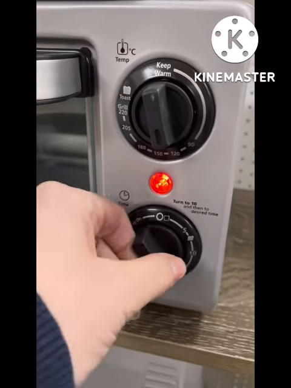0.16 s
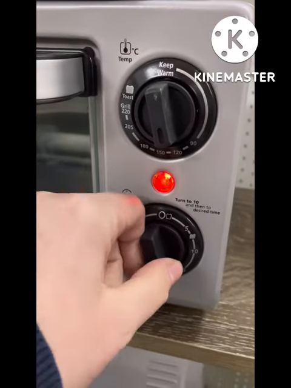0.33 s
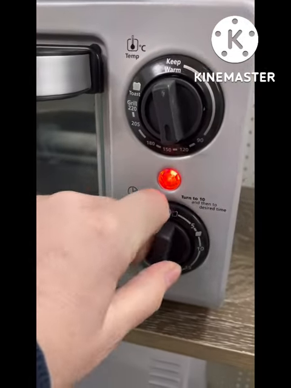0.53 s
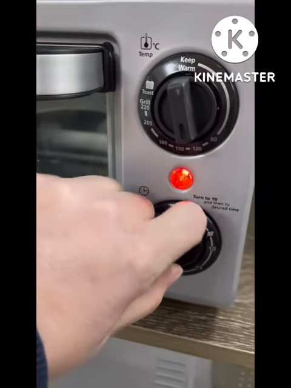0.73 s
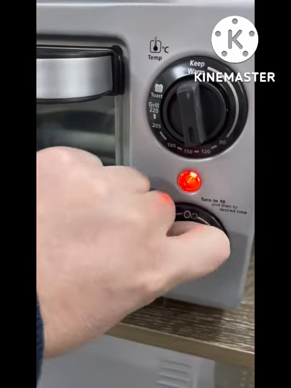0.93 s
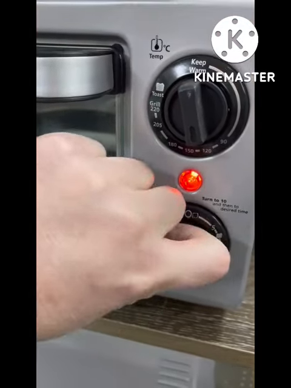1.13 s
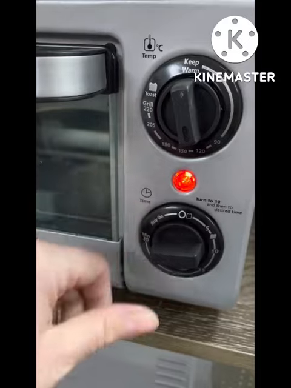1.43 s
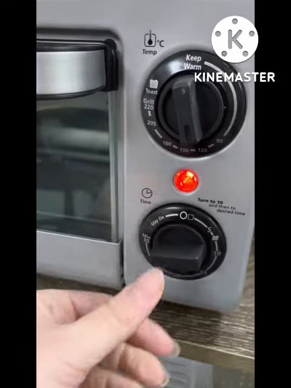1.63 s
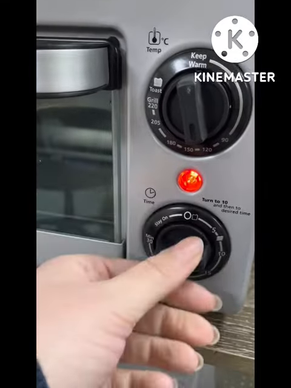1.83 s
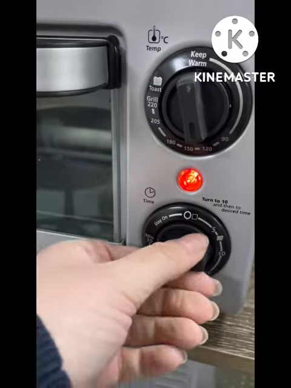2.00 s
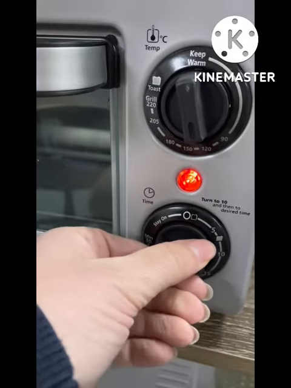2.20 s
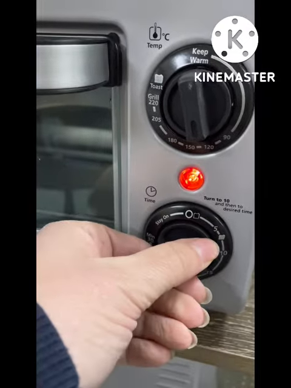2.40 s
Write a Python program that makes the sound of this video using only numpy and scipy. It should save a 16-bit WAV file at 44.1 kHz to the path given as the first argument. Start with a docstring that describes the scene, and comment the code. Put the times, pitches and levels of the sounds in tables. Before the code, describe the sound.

A clockwork oven timer is wound by hand: dull casing bumps, a second of rapid ratchet clicks, a sharp clack, then quick metallic ticking with two short knob rasps, close up in a small quiet room.

```python
"""In a small room with a faint low hum, a hand winds the clockwork timer of a small benchtop oven.
The casing bumps, the ratchet rattles for a second and the knob settles with a clack.
Then the escapement ticks about four and a half times a second, and the knob is nudged twice with a short rasp.
Contacts are sprays of tiny coloured impacts that ring the sheet-metal casing and the room;
thumps, a thud and pings are fading sine waves, and the hum and the rubbing hand are filtered noise."""
import sys
import numpy as np
from scipy import signal
from scipy.fft import rfft, irfft, next_fast_len
from scipy.io import wavfile

SR = 44100
rng = np.random.default_rng(int(sys.argv[2]) if len(sys.argv) > 2 else 0)


def dump(signal):
    """Clip the signal to [-1, 1] and save it as 16-bit WAV at the path in sys.argv[1]."""
    limited = np.clip(np.atleast_2d(signal).T, -1, 1)
    pcm = np.round(limited * 32767).astype(np.int16)
    wavfile.write(sys.argv[1], SR, pcm)


N = 112454  # length in samples

# every level_db is relative: gains, filters and the room act on it later
SOFT_FALL_S = 0.0042  # how fast rasps and soft noise bands die away
CHATTER_ROUGH = 0.73  # how unequal their tiny impacts are


def undb(db):
    """Turn decibels into a gain."""
    return 10 ** (np.asarray(db) / 20)


def unit(x):
    """Scale to an rms (average strength) of 1."""
    return x / np.sqrt(np.mean(x ** 2))


def fade(t, t60):
    """A decay of 60 dB in t60 seconds."""
    return np.exp(-np.log(1000) * t / t60)


def seconds_since(start):
    """Time passed since an event, held at zero before it."""
    return np.maximum(np.arange(N) / SR - start, 0)


def across(points, size):
    """Read a (frequency_hz, value) table at every frequency of a transform."""
    p = np.array(points, float)
    freqs = np.fft.rfftfreq(size, 1 / SR)
    return np.interp(np.log(freqs + 1), np.log(p[:, 0]), p[:, 1])


def colour(x, points):
    """Shape the tone through (frequency_hz, level_db) points with a unit-power filter that never sounds early."""
    size = next_fast_len(2 * N)
    cepstrum = irfft(np.log(unit(undb(across(points, size)))), size)
    # folding the second half onto the first makes the filter minimum-phase
    cepstrum[1:size // 2] *= 2
    cepstrum[size // 2 + 1:] = 0
    tone_filter = np.exp(rfft(cepstrum))
    return irfft(rfft(x, size) * tone_filter, size)[..., :N]


def chatter(rows, fall_s, rough):
    """Contacts (start_s, length_s, level_db): sprays of tiny impacts that build up, hold and die away."""
    power = np.zeros(N)
    for start, length, db in rows:
        age = seconds_since(start)
        rise_s = 0.0004 + 0.12 * length  # longer contacts build up more slowly
        rise = 1 - np.exp(-np.minimum(age / rise_s, 20))
        fall = np.exp(-np.clip((age - length) / fall_s, 0, 20))
        power += (undb(db) * rise * fall) ** 2
    impacts = rng.choice([-1, 1], N) * np.exp(rough * rng.standard_normal(N))
    return np.sqrt(power) * unit(impacts)


def hum():
    """Low room rumble made of noise, with two faint steady tones and hardly any treble."""
    # colour of the rumble: frequency_hz, level_db
    hum_colour = [(20, -38.5), (35, -1), (58, 1), (78, 2), (95, -1.5), (125, -8.5), (230, -17.5),
                  (400, -35), (1200, -50.5), (15000, -48.5)]
    # steady tones: pitch_hz, level_db
    hum_tones = [(63, -57), (94.5, -53.5)]
    t = np.arange(N) / SR
    tones = 0
    for hz, db in hum_tones:
        tones = tones + undb(db) * unit(np.sin(2 * np.pi * (hz * t + rng.random())))
    soften = signal.butter(2, 8000, fs=SR, output="sos")
    rumble = signal.sosfilt(soften, colour(rng.standard_normal(N), hum_colour))
    return tones + undb(-52) * unit(rumble)


def rubbing():
    """A hand rubbing on the knob: soft noise that swells and fades."""
    # course of the rubbing: time_s, level_db
    rub_course = [(0, -33.5), (0.33, -60.5), (0.42, -58), (1.03, -54.5), (1.25, -56), (1.4, -80.5),
                  (2.2, -71), (2.55, -77)]
    # colour of the rubbing: frequency_hz, level_db
    rub_colour = [(80, -0.5), (160, -15), (255, 6), (400, -14.5), (900, -18.5), (12000, -48.5)]
    times, levels = np.array(rub_course).T
    strength = undb(np.interp(np.arange(N) / SR, times, levels))
    return strength * colour(rng.standard_normal(N), rub_colour)


def thud():
    """A deep, soft thud as the knob is nudged: one low swing, quickly damped."""
    # the thud: start_s, pitch_hz, t60_s (time to fade 60 dB), level_db
    deep_swing = (2.205, 68, .25, -35)
    start, hz, t60, db = deep_swing
    age = seconds_since(start)
    onset = 1 - np.exp(-age * hz)
    return undb(db) * onset * fade(age, t60) * np.sin(2 * np.pi * hz * age)


def bumps():
    """Dull handling thumps: each makes low resonances ring, and later ones are softer in tone."""
    # thumps: start_s, level_db
    thumps = [(0.0, -28), (0.020, -24.5), (0.044, -23.5), (0.07, -34), (0.083, -27), (0.099, -23.5),
              (0.117, -31)]
    # low resonances they set ringing: pitch_hz, t60_s (time to fade 60 dB), level_db
    bump_modes = [(180.3, 0.15, 0), (214, 0.085, 2.5), (294.3, 0.16, 0.5), (318, 0.091, -5.5),
                  (524, 0.12, -1.5)]
    dull_db = 80  # loss per octave above the lowest resonance, per second of start time
    rise_s, gain_db = 0.00048, -7
    out = 0
    for start, strength in thumps:
        age = seconds_since(start)
        ring = 0
        for hz, t60, db in bump_modes:
            loss_db = dull_db * start * np.log2(hz / bump_modes[0][0])
            ring = ring + undb(db - loss_db) * fade(age, t60) * np.sin(2 * np.pi * hz * age)
        out = out + undb(strength + gain_db) * (1 - np.exp(-age / rise_s)) * ring
    # a soft contact keeps the thumps to a low band
    soft_band = signal.butter(2, (80, 416), "band", fs=SR, output="sos")
    return signal.sosfilt(soft_band, out)


def taps():
    """Small dry taps of handling: very short sprays of impacts."""
    # taps: start_s, level_db
    tap_times = [(0.154, -39), (0.684, -39), (1.029, -37.5)]
    # colour of a tap: frequency_hz, level_db
    tap_colour = [(150, -48), (500, -1), (1350, 3), (2000, -5), (12000, -49)]
    rows = [(start, 0, db) for start, db in tap_times]
    return colour(chatter(rows, fall_s=0.0036, rough=0.46), tap_colour)


def wash_and_rustles():
    """Soft low-mid room wash lingering after the clack, then two faint rustles: bands of noise."""
    # the wash and the two rustles: start_s, length_s, level_db, centre_hz
    noise_bands = [(1.194, 0.069, -64.5, 780), (1.855, 0.16, -79, 1750), (2.02, 0.044, -78, 1400)]
    out = 0
    for start, length, db, hz in noise_bands:
        # about an octave and a half wide
        band = signal.butter(2, (hz / 2, hz * 1.5), "band", fs=SR, output="sos")
        soft_noise = signal.sosfilt(band, chatter([(start, length, db)], SOFT_FALL_S, CHATTER_ROUGH))
        out = out + np.sqrt(SR / 2 / hz) * soft_noise  # makes up for the power the band removes
    return out


def knob():
    """The knob rasps against its friction clutch, and its plastic clacks into place after the turn."""
    # nudges against the clutch: start_s, length_s, level_db
    nudges = [(2.125, 0.013, -59.5), (2.164, 0.029, -40), (2.514, 0.016, -42.5), (2.526, 0.011, -43)]
    # clack at the end of the turn: start_s, level_db
    knocks = [(1.176, -29.5)]
    # colour of a rasp: frequency_hz, level_db
    nudge_colour = [(250, -4), (600, -10), (1050, -0.5), (1750, -5.5), (2300, 2), (4700, -4.5), (7000, 2.5),
                    (9500, -10.5), (13500, -8), (15500, -41)]
    # colour of the clack: frequency_hz, level_db
    knock_colour = [(850, -3), (1400, -2.5), (2250, 6.5), (2850, -8), (3450, 4), (4600, -8), (6000, 9),
                    (8500, 2), (11000, -14), (13300, -4), (15500, -40)]
    rasps = undb(-1.5) * colour(chatter(nudges, SOFT_FALL_S, CHATTER_ROUGH), nudge_colour)
    rows = [(start, 0, db) for start, db in knocks]
    clack = colour(chatter(rows, fall_s=0.0028, rough=0.49), knock_colour)
    return rasps + clack


def ratchet():
    """The pawl snaps off each tooth with a short bright rattle and scrapes on, duller, up the next."""
    # teeth slipping while the knob is wound: start_s, level_db
    teeth = [(0.001, -37.5), (0.021, -41.5), (0.045, -42.5), (0.069, -42.5), (0.084, -39), (0.102, -41),
             (0.123, -41), (0.135, -40), (0.153, -38), (0.170, -37), (0.19, -42), (0.218, -43),
             (0.236, -41.5), (0.261, -48), (0.297, -45), (0.314, -46), (0.34, -42.5), (0.3725, -39),
             (0.402, -40), (0.423, -43.5), (0.445, -42.5), (0.468, -42), (0.499, -46), (0.523, -44),
             (0.547, -42.5), (0.571, -44.5), (0.588, -49), (0.625, -40), (0.656, -40), (0.686, -39),
             (0.701, -40.5), (0.729, -41), (0.767, -43), (0.786, -42), (0.821, -39), (0.848, -39),
             (0.88, -39.5), (0.907, -39.5), (0.933, -39.5), (0.955, -38.5), (0.979, -40), (1.011, -39),
             (1.034, -48.5), (1.056, -44.5), (1.102, -50)]
    # colour of a tooth: frequency_hz, level_db
    tooth_colour = [(200, -16), (1000, -16), (1830, -14.5), (2130, -1), (2850, -6.5), (3500, -1.5),
                    (4750, -9), (5800, -6.5), (7500, -4.5), (10500, -13.5), (13000, -18), (15500, -30.5)]
    hold_s, split_hz = 0.006, 3400  # contact length; where scrape and snap part
    # each tooth has its own balance of bright snap and dull scrape
    tilt_db = 1.5 * rng.standard_normal(len(teeth))

    def part(kind, tilts, fall_s):
        rows = [(start, hold_s, db + change) for (start, db), change in zip(teeth, tilts)]
        split = signal.butter(2, split_hz, kind, fs=SR, output="sos")
        return signal.sosfilt(split, chatter(rows, fall_s, rough=0.55))

    snap = part("high", tilt_db, fall_s=0.0055)
    scrape = part("low", -tilt_db, fall_s=0.011)
    return colour(undb(-1) * snap + undb(-3) * scrape, tooth_colour)


def escapement():
    """Small bright metal clicks as the pallet unlocks and drops, each with a brief ping of its own pitch."""
    # light unlockings and loud drops: start_s, level_db, pitch_hz of the ping
    ticks = [(1.2568, -51, 7550), (1.2785, -43, 3350), (1.455, -58, 8340), (1.501, -38.5, 3520),
             (1.698, -57, 6900), (1.7168, -42.5, 5100), (1.8989, -57, 8100), (1.9419, -39, 6820),
             (2.162, -39.5, 6700), (2.352, -68.5, 7040), (2.4, -55.5, 3190)]
    # colour of a click: frequency_hz, level_db
    tick_colour = [(400, -30), (1050, -8), (1700, -12), (2700, -6.5), (3470, -5), (4600, -8), (7600, -0.5),
                   (10000, -11), (13000, -7.5), (15500, -35)]
    ping_t60_s, ping_db = 0.014, -6.5
    pings = 0
    for start, db, hz in ticks:
        age = seconds_since(start)
        pings = pings + undb(db + ping_db) * fade(age, ping_t60_s) * np.sin(2 * np.pi * hz * age)
    rows = [(start, 0, db) for start, db, _ in ticks]
    clicks = colour(chatter(rows, fall_s=0.0044, rough=0.52), tick_colour)
    return pings + undb(-2) * clicks


def response():
    """What one impact becomes at two microphones: direct click, casing ring, near reflections, room tail."""
    # ringing of the casing and clock frame: pitch_hz, t60_s (time to fade 60 dB), level_db
    casing_modes = [(520, .16, 2), (786, .2, -4), (2085, .2, -5), (2155, .2, -3), (2285, .22, -3),
                    (2425, .2, 0), (2482, .2, -2), (2590, .2, -5), (3037, .18, -5), (3420, .11, 0),
                    (3660, .12, -2), (5910, .12, -3), (6690, .12, -2), (6830, .12, -4)]
    # room tail: frequency_hz, t60_s, level_db
    room_bands = [(198, 0.88, 8), (990, 0.35, 7.5), (2200, 0.28, 6.5), (5660, 0.16, 0.5),
                  (12800, 0.51, -18)]
    # share of the reflections that differs between the microphones: frequency_hz, share (0-1)
    room_width = [(250, 0.09), (700, 0.34), (3000, 0.22)]
    size = SR // 2
    t = np.arange(size) / SR
    width = np.clip(across(room_width, size), 0, 1)

    def energy_one(v):
        return unit(v) / np.sqrt(size)

    def diffuse():
        mid, side = rfft(rng.standard_normal((2, size)))
        return mid * np.sqrt(1 - width) + side * np.sqrt(width) * np.array([[1], [-1]])

    tail, field = 0, diffuse()
    for k, (_, t60, db) in enumerate(room_bands):
        # this band is 1 at its own frequency and slopes to 0 at its neighbours
        band = across([(row[0], float(j == k)) for j, row in enumerate(room_bands)], size)
        tail = tail + undb(db) * irfft(field * band, size) * energy_one(fade(t, t60))
    early = irfft(diffuse(), size) * fade(t, 0.14)
    ring = 0
    for hz, t60, db in casing_modes:
        phase = rng.uniform(-1, 1, (2, 1))
        ring = ring + undb(db) * fade(t, t60) * np.cos(2 * np.pi * hz * t + phase)
    out = tail + undb(-9.5) * energy_one(early) + undb(-8) * energy_one(ring)
    out[:, 0] += 1  # the direct click
    return out


def scene():
    """Clockwork and knob sound through casing and room, over the handling, the thud and the hum."""
    contacts = ratchet() + escapement() + knob() + wash_and_rustles()
    in_room = signal.fftconvolve(contacts[None], response(), axes=1)[:, :N]
    handling = bumps() + taps() + rubbing()
    return in_room + handling + thud() + hum()


def record(dry):
    """Two microphone ports differ in phase and level, and the highest treble is cut."""
    # left lead between the ports: frequency_hz, phase_radians
    port_phase = [(2300, 0), (2950, 1.5), (3400, -.3), (4300, .7), (4800, 2.7), (5200, 6.1), (9200, 9.2),
                  (11200, 9.6), (14200, 12.5)]
    # left level over right: frequency_hz, level_db
    port_balance = [(330, 0.5), (600, 3), (1000, 6), (1800, 0), (3000, -0.5), (3700, -2.5), (5000, 0)]
    size = next_fast_len(2 * N)
    sides = np.array([[.5], [-.5]])  # half of each difference goes to each side
    gains = undb(sides * across(port_balance, size))
    turns = np.exp(1j * sides * across(port_phase, size))
    heard = irfft(rfft(dry, size) * gains * turns, size)[:, :N]
    top_cut = signal.ellip(10, .2, 70, 15900, fs=SR, output="sos")
    return signal.sosfilt(top_cut, heard)


dry = scene()
out = record(dry)
dump(out)
```